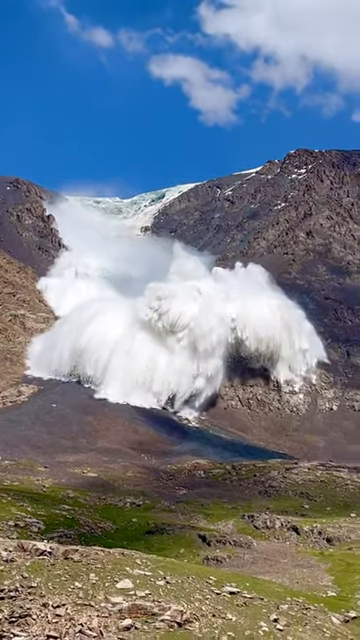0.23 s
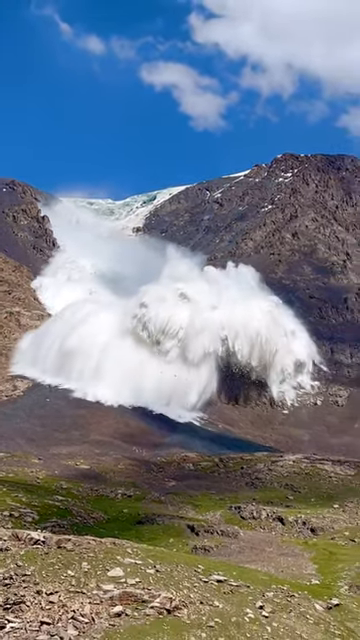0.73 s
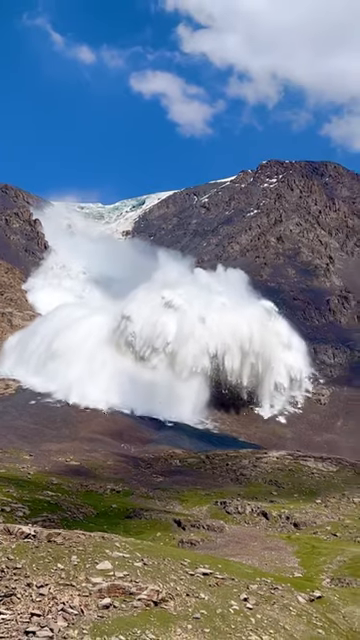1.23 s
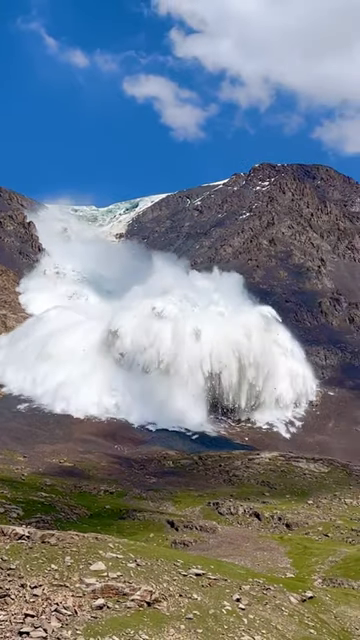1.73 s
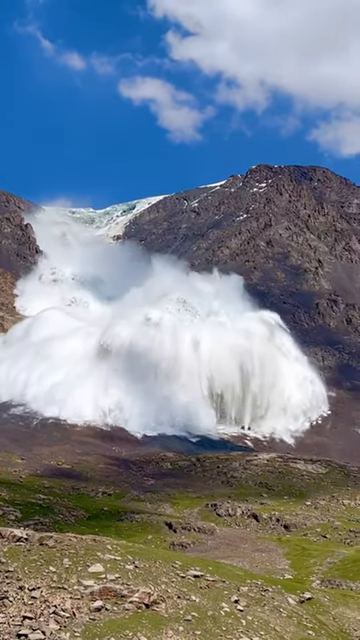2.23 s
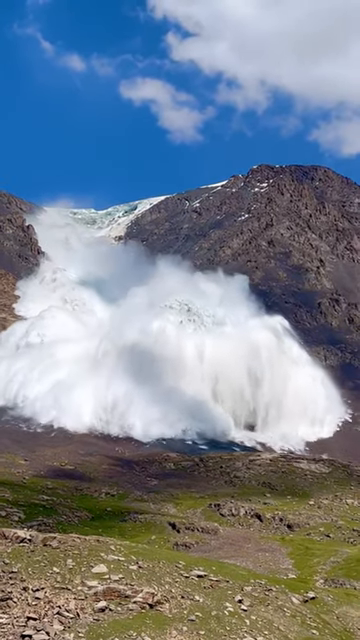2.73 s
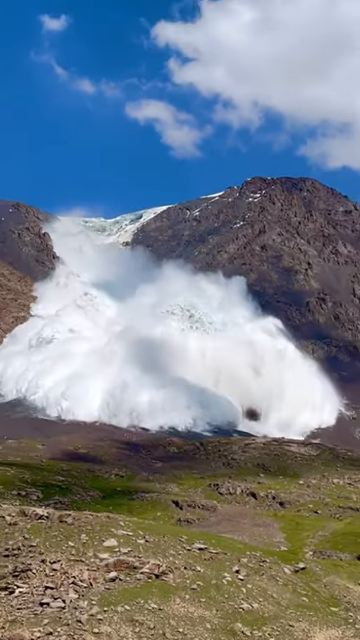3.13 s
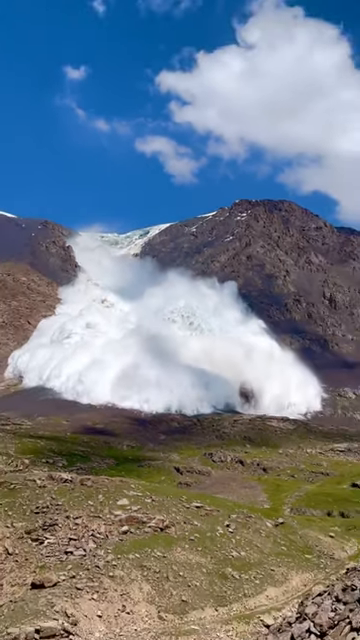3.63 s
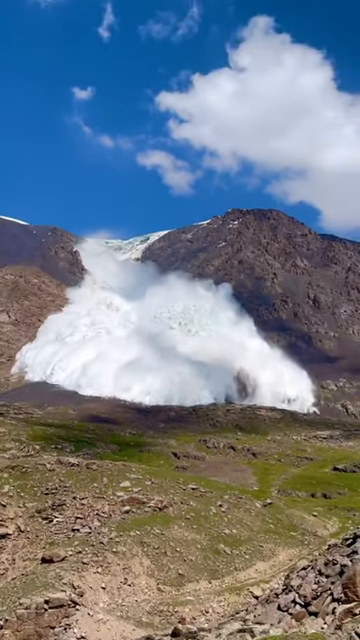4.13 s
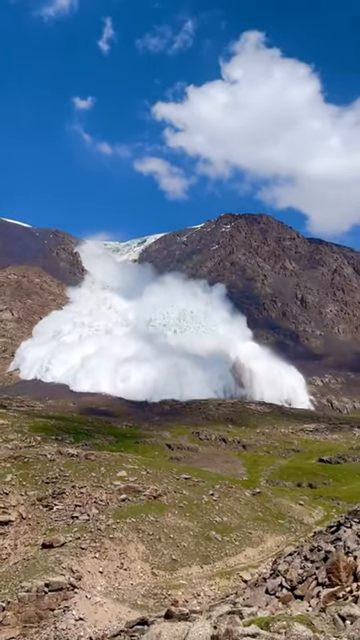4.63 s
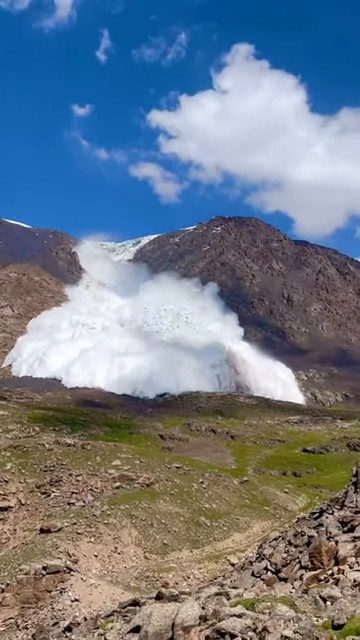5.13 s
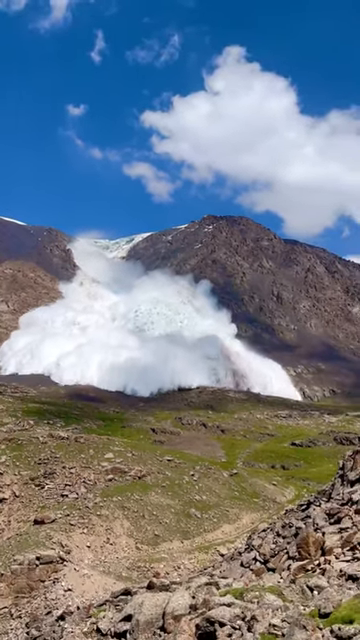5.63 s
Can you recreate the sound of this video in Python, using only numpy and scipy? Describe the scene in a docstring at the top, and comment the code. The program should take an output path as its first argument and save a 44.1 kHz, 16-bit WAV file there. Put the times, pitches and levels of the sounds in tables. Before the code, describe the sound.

A distant avalanche rumbles down a mountainside, its deep boom and dull roar swelling with heavy thuds while light wind buffets the microphone.

```python
"""On a mountainside, a distant avalanche of snow and ice pours down: a deep boom, tumbling blocks and a dull
roar that swells twice, its treble lost in the air. These are shaped noise and showers of random blows.
Brief surges of the rumble and roar, each around one pitch, rise and ebb; heavy masses thud on the slope.
A soft rush of noise lies off to the left. Close by, light wind buffets the two microphone ports,
something scuffs faintly, grit ticks in short rough rings, and a faint hiss lies beneath."""
import sys
import numpy as np
from scipy.fft import rfft, irfft, next_fast_len
from scipy.io import wavfile
from scipy.ndimage import map_coordinates

SR = 44100
rng = np.random.default_rng(int(sys.argv[2]) if len(sys.argv) > 2 else 0)


def transcribe(signal):
    """Save signal, clipped to [-1, 1], as a 16-bit WAV file at the path in sys.argv[1]."""
    frames = np.atleast_2d(signal).T
    limited = np.clip(frames, -1, 1)
    pcm = np.round(limited * 32767).astype(np.int16)
    wavfile.write(sys.argv[1], SR, pcm)


N = 260190  # length in samples


def amp(db):
    """Decibels to gain."""
    return 10 ** (np.asarray(db) / 20)


def unit(x):
    """Scale x to an rms (average strength) of 1."""
    return x / np.sqrt(np.mean(x ** 2) + 1e-20)


def seconds():
    """The time of every sample."""
    return np.arange(N) / SR


def along(points, hz):
    """Read a table of (f/Hz, value) at any frequency, on a log axis."""
    f, value = np.transpose(points)
    return np.interp(np.log(hz + 1), np.log(f + 1), value)


def curves(rows):
    """Join the rows of a table with straight lines: one curve for each column after the time."""
    times, *columns = np.transpose(rows)
    return [np.interp(seconds(), times, column) for column in columns]


def wobble(rate):
    """A smooth random curve through `rate` random points a second; it repeats after 1024 points."""
    knots = rng.standard_normal(1024)
    return map_coordinates(knots, [np.arange(N) * rate / SR], mode="wrap")


def filtered(x, response):
    """Change the strength and timing of each frequency in x, as response(hz) says."""
    padded = next_fast_len(N + SR // 2)  # spare room, so that the end does not wrap onto the start
    hz = np.fft.rfftfreq(padded, 1 / SR)
    return irfft(rfft(x, padded) * response(hz), padded)[..., :N]


def coloured(x, spectrum):
    """Give x a tone colour from a table, at rms 1."""
    return unit(filtered(x, lambda hz: amp(along(spectrum, hz))))


def noise():
    """Two unrelated white noises."""
    return rng.standard_normal((2, N))


def impacts(rate, spread_db):
    """Two unrelated showers of blows, `rate` a second on average, of scattered sizes, at rms 1."""
    struck = rng.random((2, N)) < rate / SR
    size_db = spread_db * noise()
    direction = np.sign(noise())
    return unit(struck * direction * amp(size_db))


def mostly_shared(pair, side_db):
    """Left and right from a common part (row 0) and a weaker opposed part (row 1)."""
    shared, own = pair
    return np.array([shared + amp(side_db) * own, shared - amp(side_db) * own])


# strength of the avalanche before trims: [t/s, boom level/dB, tumbling blocks level/dB, roar level/dB]
AVALANCHE_FLOW = [(0.0, -36, -49, -40.5), (0.55, -32.5, -45.5, -40), (0.85, -34, -43, -39.5),
                  (1.35, -34.5, -35.5, -36.5), (2.05, -32.5, -32.5, -34), (2.48, -37.5, -33.5, -32),
                  (2.7, -36.5, -28.5, -30), (2.85, -26.5, -31, -30), (3.02, -30.5, -27.5, -28),
                  (3.25, -28, -24, -26.5), (3.55, -26.5, -23.5, -26), (3.75, -29, -24.5, -25),
                  (4.1, -25, -24.5, -26.5), (4.25, -27, -28.5, -28.5), (4.45, -26.5, -30.5, -28),
                  (4.65, -30.5, -30.5, -28.5), (5.0, -28.5, -29, -27), (5.27, -27.5, -24.5, -25.5),
                  (5.65, -25.5, -27.5, -25), (5.9, -28, -26, -27.0)]
# tone colours of its four layers: [f/Hz, relative level/dB per Hz]
BOOM_SPECTRUM = [(12, -39.5), (25, -29), (40, -11), (58, -0.5), (85, -1), (110, -4), (150, -18.5),
                 (300, -69.5), (600, -120)]
TUMBLE_SPECTRUM = [(40, -63), (85, -12.5), (120, 0.5), (170, 0), (240, -1), (320, -14), (450, -28.5),
                   (900, -66.5), (2000, -120)]
ROAR_SPECTRUM = [(120, -52), (280, 2.5), (380, 1.5), (480, 0.5), (680, -1), (880, -7.5), (1020, -6),
                 (1250, -17.5), (1600, -30.5), (2400, -67.5), (4000, -120)]
POWDER_SPECTRUM = [(600, -40.5), (1050, -1), (1300, -1), (1550, -3.5), (1800, -10.5), (2100, -15.5),
                   (2350, -22.5), (2600, -29), (3200, -42.5), (4200, -67.5), (8000, -87.5)]
FULL_FLOW_DB = -28  # roar level in the table that counts as full flow
POWDER_DB, POWDER_GROWS = -43, 0.85  # level at full flow, halfway through; dB gained per dB of flow
POWDER_LAG_S, POWDER_BUILD_DB_PER_S = 0.072, 0.84  # the powder cloud trails the flow and keeps building


def avalanche(boom_trim_db=0, tumble_trim_db=0.65, roar_trim_db=-0.38):
    """The sliding mass booms, blocks tumble within it, and the flow roars and throws up rushing powder."""
    boom_db, tumble_db, roar_db = curves(AVALANCHE_FLOW)

    boom_level = amp(boom_db + boom_trim_db + 0.18 * wobble(25))
    boom = boom_level * coloured(noise(), BOOM_SPECTRUM)

    tumble_level = amp(tumble_db + tumble_trim_db + 0.57 * wobble(10))
    tumble = tumble_level * coloured(impacts(rate=2500, spread_db=0.5), TUMBLE_SPECTRUM)

    roar_level = amp(roar_db + roar_trim_db + 0.28 * wobble(21))
    roar = roar_level * coloured(impacts(rate=3500, spread_db=3.0), ROAR_SPECTRUM)

    # the harder the flow runs, the brighter its upper edge of rushing powder
    t = seconds()
    drive_db = np.interp(t - POWDER_LAG_S, t, roar_db) - FULL_FLOW_DB
    build_db = POWDER_BUILD_DB_PER_S * (t - t.mean())
    powder_db = POWDER_DB + POWDER_GROWS * drive_db + build_db
    powder = amp(powder_db + 0.77 * wobble(8.9)) * coloured(noise(), POWDER_SPECTRUM)
    return boom + tumble + roar + powder


# brief surges of the rumble and roar: [t/s, length/s, level/dB at the crest of the swell, f/Hz]
SURGE_ROWS = [(.31, 0.074, -34, 179), (.385, 0.082, -37, 169.3), (.55, 0.086, -29.5, 99),
              (.645, .1, -38, 428), (.93, 0.11, -25, 80.7), (1.1, .14, -33, 46.3),
              (1.255, 0.08, -31, 203.4), (1.35, .1, -30, 166), (1.485, 0.23, -32, 48.6),
              (1.51, 0.11, -45, 848), (1.75, 0.081, -36, 290), (1.9, 0.18, -37.5, 647),
              (2.03, 0.1, -30, 95.3), (2.2, .12, -34.5, 148), (2.47, .08, -26.5, 69.6),
              (2.565, 0.12, -29.5, 360), (2.68, .15, -46, 1127), (2.73, 0.083, -32.5, 540),
              (3.06, 0.08, -22.5, 227), (3.18, 0.14, -23, 59.3), (3.195, .14, -26, 344),
              (3.32, .09, -36.5, 1124), (3.345, 0.12, -25.5, 78), (3.36, 0.089, -28.5, 347),
              (3.545, 0.078, -21.5, 112.6), (3.53, 0.13, -26.5, 360), (3.595, 0.089, -23, 205),
              (3.68, 0.089, -22.5, 109.5), (3.76, 0.15, -37.5, 923), (3.835, 0.13, -21.5, 184),
              (3.85, 0.064, -16.5, 105.1), (3.935, .15, -29, 266.4), (3.98, 0.26, -38.5, 929),
              (3.98, 0.11, -27, 127.3), (4.38, 0.075, -26.5, 50), (4.57, .08, -25.5, 111.3),
              (4.88, .08, -25, 115), (5.05, .11, -39, 1144), (5.11, .1, -31, 48), (5.17, 0.16, -29, 336),
              (5.205, 0.13, -30.5, 58.6), (5.31, .18, -32, 744), (5.485, 0.12, -22, 176.7),
              (5.56, 0.091, -26.5, 135.4), (5.66, .14, -27.5, 420), (5.7, .12, -24, 181)]
SURGE_WIDTH_OCT = 0.36  # spread of a surge around its pitch, in octaves


def surges():
    """Brief surges of the rumble and roar: random blows filtered around one pitch, swelling and ebbing."""
    out = np.zeros((2, N + SR))
    hz_axis = np.fft.rfftfreq(SR, 1 / SR)
    age = np.arange(SR) / SR
    shower = impacts(rate=1500, spread_db=3.5)
    for start, length, db, hz in SURGE_ROWS:
        swell = np.sin(np.pi * np.clip(age / length, 0, 1))
        octaves_off = np.log2((hz_axis + 1) / hz)
        band = np.exp(-0.5 * (octaves_off / SURGE_WIDTH_OCT) ** 2)
        # one second of blows from a random place in the shower
        first = rng.integers(N - SR)
        blows = shower[:, first:first + SR]
        surge = swell * irfft(rfft(blows) * band, SR)
        even = np.array([unit(row) for row in surge])
        at = round(start * SR)
        out[:, at:at + SR] += amp(db) * np.sqrt(np.mean(swell ** 2)) * even
    return out[:, :N]


# heavy masses landing: [t/s, level/dB at the top of the swing's outline, f/Hz]
LANDING_MASSES = [(.568, -23.5, 131.2), (1.406, -20, 160), (1.554, -24.5, 130), (2.234, -20.5, 173),
                  (2.661, -22, 148.6), (2.766, -20, 263.6), (2.919, -17, 130), (3.21, -13, 115.9),
                  (3.254, -14, 170), (3.39, -15, 160), (3.573, -17, 188), (3.848, -16.5, 174.7),
                  (4.431, -19, 156.6), (5.235, -18.5, 170.2), (5.53, -14.5, 170), (5.604, -14.5, 130),
                  (5.735, -19, 190.6)]
THUD_RISE_S = 0.0024  # time to the top of the outline
CRUNCH_DB = -11  # snow crushed under a landing mass, relative to its thud


def thuds():
    """Each landing mass sends one short, low swing of pressure and crushes the snow under it."""
    t, out = seconds(), np.zeros(N)
    crunch = amp(CRUNCH_DB) * coloured(noise()[0], ROAR_SPECTRUM)
    for start, db, hz in LANDING_MASSES:
        age = np.maximum(t - start, 0)
        outline = age / THUD_RISE_S * np.exp(1 - age / THUD_RISE_S)
        swing = np.sin(2 * np.pi * hz * age)
        out += amp(db) * outline * (swing + crunch)
    return np.array([out, np.zeros(N)])  # direct sound only, nothing scattered


# how distant sound reaches the two ports
PORT_LEAD = [(50, -.02), (140, -.1), (220, -.22), (360, -.56), (510, -.55), (610, -.22), (950, -.07),
             (1450, -.1), (1810, 0), (2240, 1.2), (2550, 2.6), (3200, 1.8)]  # [f/Hz, left lead/rad]
PORT_LEAN = [(60, -.5), (200, -1), (300, -1), (530, -4.5), (720, -0.3), (850, -3), (1050, 0.2), (1500, 0),
             (2600, 0.3)]  # [f/Hz, left minus right level/dB]
PORT_LIKENESS = [(60, 1), (500, 1), (950, 1), (1500, 0.99), (2100, 0.92), (2700, 0.87), (3300, 0.65)]  # [f/Hz, likeness from 0 to 1]


def at_ports(pair):
    """A direct wave (row 0) and its scattered part (row 1) as the left and right ports hear them."""
    def shares(hz):
        # less likeness means a larger share of scattered sound
        turn = np.arccos(np.clip(along(PORT_LIKENESS, hz), 0, 1)) / 2
        return np.array([np.cos(turn), np.sin(turn)])

    def shading(hz):
        half = np.array([[0.5], [-0.5]])  # half the difference to each port
        return amp(half * along(PORT_LEAN, hz)) * np.exp(1j * half * along(PORT_LEAD, hz))

    direct, scattered = filtered(pair, shares)
    return filtered(np.array([direct + scattered, direct - scattered]), shading)


# a soft, wide rush off to the left
SIDE_RUSH_LEVEL = [(0, -38.5), (0.7, -34), (2, -34), (3.6, -38), (4.3, -47), (5.9, -49)]  # [t/s, level/dB]
SIDE_RUSH_SPECTRUM = [(60, -21), (115, 1), (200, 0.5), (320, -3.5), (560, -5.5), (760, -15.5),
                      (1200, -28.5), (2500, -75.5)]  # [f/Hz, relative level/dB per Hz]
RUSH_LEAD_RAD = 1.5  # part of a wave cycle by which the left port leads


def side_rush():
    """A low rush of noise from the left, whose waves lead at the left port; it sinks away late on."""
    level_db, = curves(SIDE_RUSH_LEVEL)
    sound = coloured(noise()[0], SIDE_RUSH_SPECTRUM)
    half = np.array([[0.5], [-0.5]])
    return amp(level_db) * filtered(sound, lambda hz: np.exp(1j * RUSH_LEAD_RAD * half))


# tone colour of the breeze: [f/Hz, relative level/dB per Hz]
WIND_SPECTRUM = [(15, -30), (35, -10), (70, 5.5), (150, -3), (260, -14.5), (500, -18.5), (800, -20),
                 (1300, -27), (2000, -41.5), (2700, -59.5), (3400, -73), (5000, -110)]
WIND_DB, WIND_FALL_DB_PER_S = -32.5, 1.5  # level at the start, before gusts, and its fall
GUST_DB, GUSTS_PER_S = 3.1, 14  # depth and rate of the gusts
WIND_SIDE_DB = -5  # the part of the breeze that differs between the ports


def wind():
    """A gusty breeze dies away; its eddies flutter a little differently on each port."""
    breeze_db = WIND_DB - WIND_FALL_DB_PER_S * seconds() + GUST_DB * wobble(GUSTS_PER_S)
    flutter = amp(2 * np.array([wobble(30), wobble(30)]))
    eddies = flutter * coloured(noise(), WIND_SPECTRUM)
    return amp(breeze_db) * unit(mostly_shared(eddies, side_db=WIND_SIDE_DB))


# tone colours of the rub and of its duller tail: [f/Hz, relative level/dB per Hz]
STROKE_SPECTRUM = [(1200, -24), (2600, -18), (3300, 2.5), (4500, -4), (5600, -7.5), (7200, -8), (8200, -11),
                   (9200, -36), (13000, -36.5)]
TAIL_SPECTRUM = [(1200, -23), (2500, -2), (3500, 3), (5000, -7), (7000, -10), (10000, -37.5)]
SCUFF_AT_S, SCUFF_LENGTH_S, SCUFF_DB = 0.079, 0.047, -59.5  # the stroke; level before its grain
TAIL_DB, TAIL_RISE_DB_PER_S, TAIL_FADE_DB_PER_S = -63.5, 1502, 229  # level at its top, before its grain
SCUFF_GRAIN_DB, SCUFF_GRAINS_PER_S = 4, 220  # the rub catches and slips


def scuff():
    """A brief, faint, grainy rub close to the microphone swells and ebbs; it dulls as it trails off."""
    age = seconds() - SCUFF_AT_S
    grain = amp(SCUFF_GRAIN_DB * wobble(SCUFF_GRAINS_PER_S))
    swell = np.sin(np.pi * np.clip(age / SCUFF_LENGTH_S, 0, 1))
    stroke = amp(SCUFF_DB) * swell * coloured(impacts(rate=1400, spread_db=-2.5), STROKE_SPECTRUM)
    # the tail is loudest halfway through the stroke
    after = age - SCUFF_LENGTH_S / 2
    tail_db = TAIL_DB + np.minimum(TAIL_RISE_DB_PER_S * after, -TAIL_FADE_DB_PER_S * after)
    tail = amp(tail_db) * coloured(noise(), TAIL_SPECTRUM)
    return mostly_shared(grain * (stroke + tail), side_db=-6.5)


# faint ticks of grit nearby: [t/s, level/dB before the soft rise, fade and roughness, f/Hz]
GRIT_TICKS = [(.084, -65, 3500), (.097, -63, 4000), (.112, -61, 3660), (.225, -77, 5100), (.24, -77, 7400),
              (2.86, -67, 4300), (3.769, -64.5, 3400), (5.262, -75.5, 4900), (5.345, -74, 3800),
              (5.42, -74.5, 3900), (5.454, -78, 4730), (5.554, -72, 4260)]


def ticks(fade_60db_s=0.05, roughness_per_s=1500, rise_s=0.002):
    """Each bit of grit gives one short, soft, rough ring, alike at both ports."""
    t, out = seconds(), np.zeros(N)
    for start, db, hz in GRIT_TICKS:
        age = np.maximum(t - start, 0)
        fading = amp(db - 60 * age / fade_60db_s)
        soft_start = 1 - np.exp(-age / rise_s)
        out += fading * soft_start * wobble(roughness_per_s) * np.sin(2 * np.pi * hz * age)
    return out


# tone colours of the steady hiss and of an inaudibly weak narrow band: [f/Hz, relative level/dB per Hz]
HISS_SPECTRUM = [(100, -2), (2800, 11), (4000, -4.5), (6000, -12.5), (8000, -13.5), (10000, -13.5),
                 (13000, -21.5)]
NARROW_BAND_SPECTRUM = [(8500, -37), (9350, 1.5), (9900, 0), (10400, -37)]
NARROW_BAND_DB = -60.5  # added to the roar level in the flow table


def hiss():
    """A faint, steady hiss of noise; a narrow band of noise far below hearing level is added to it."""
    roar_db = curves(AVALANCHE_FLOW)[-1]
    narrow_band = amp(NARROW_BAND_DB + roar_db) * coloured(noise()[0], NARROW_BAND_SPECTRUM)
    steady = amp(-78) * mostly_shared(coloured(noise(), HISS_SPECTRUM), side_db=-3)
    return steady + narrow_band


def scene():
    """Far sound arrives nearly alike at both ports; the side rush and the near sounds lie over it."""
    far = at_ports(avalanche() + surges() + thuds())
    near = wind() + scuff() + ticks()
    return far + side_rush() + near + hiss()


def record(dry):
    """Only sound below a top frequency of 13 kHz is kept."""
    return filtered(dry, lambda hz: hz < 13000)


dry = scene()
out = record(dry)
transcribe(out)
```